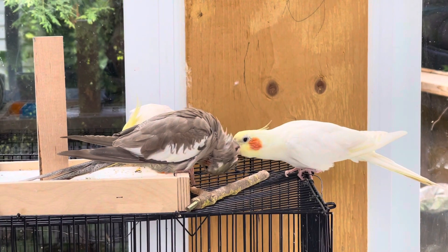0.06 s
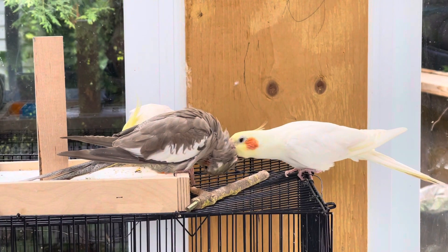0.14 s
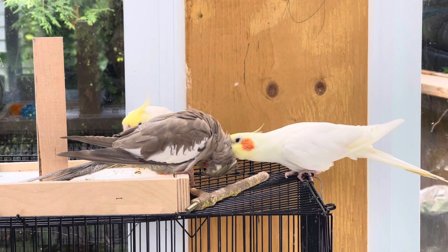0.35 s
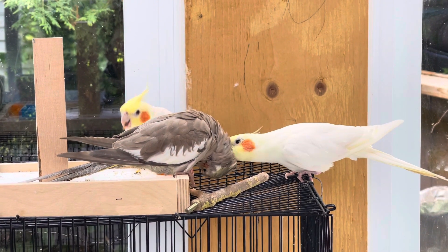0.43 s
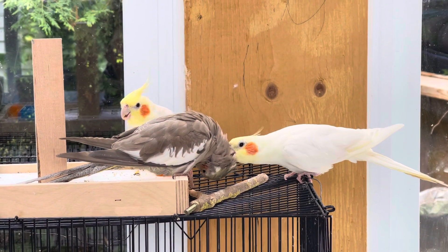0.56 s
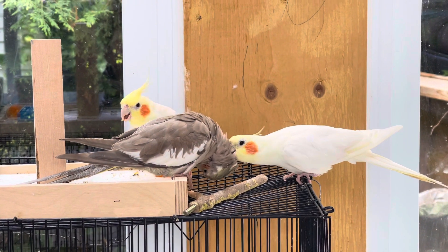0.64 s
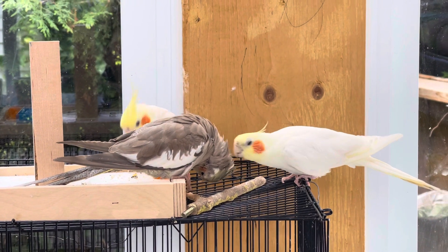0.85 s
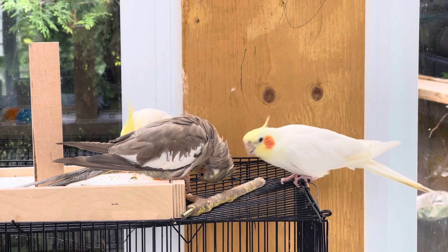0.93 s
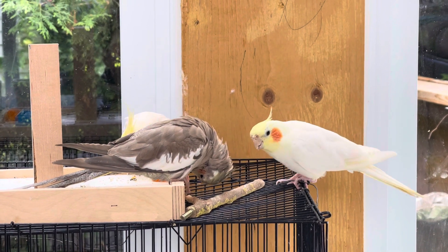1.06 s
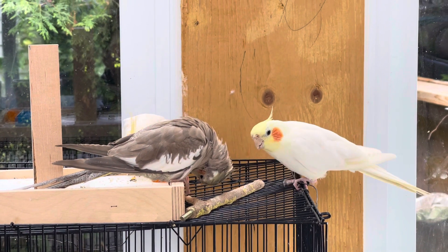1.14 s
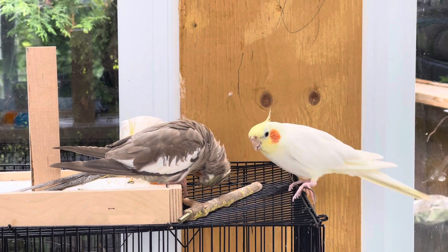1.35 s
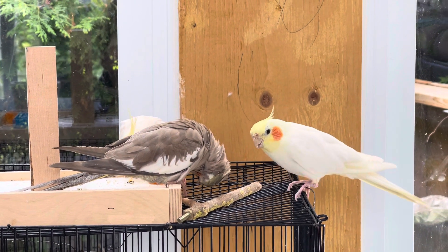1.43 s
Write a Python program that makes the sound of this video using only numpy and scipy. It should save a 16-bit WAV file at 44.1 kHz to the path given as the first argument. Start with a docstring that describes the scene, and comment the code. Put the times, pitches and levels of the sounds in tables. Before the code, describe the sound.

A cockatiel hisses three times, with light claw taps and rustling feathers.

```python
"""A small live room, on top of a cage: a cockatiel hisses three times at another, forcing air through
throat and open beak; the second hiss breaks into a short rising squeak. Claws tap on wood and wire,
feet scuff and feathers rustle as it draws back. The room answers, over a low rumble and a machine's hum.
The recorder's stereo processing shifts left against right in phase, by frequency."""
import sys
import numpy as np
from scipy import signal
from scipy.fft import rfft, irfft, next_fast_len
from scipy.io import wavfile
from scipy.ndimage import map_coordinates

SR = 44100
rng = np.random.default_rng(int(sys.argv[2]) if len(sys.argv) > 2 else 0)


def digitize_waveform(pressure):
    """Quantize a signal to 16-bit integers and store it at the path in sys.argv[1].

    Rows of a 2-D input are taken as channels; values are limited to [-1, 1].
    """
    field = np.atleast_2d(pressure).T
    bounded = np.clip(field, -1, 1)
    quanta = np.round(bounded * 32767).astype(np.int16)
    wavfile.write(sys.argv[1], SR, quanta)


N = 66150


def amp(db):
    return 10 ** (np.asarray(db) / 20)


def unit(x):
    return x / np.sqrt(np.mean(x ** 2) + 1e-20)


def times():
    return np.arange(N) / SR


def decay(age_s, t60_s):
    return np.exp(-np.log(1000) * age_s / t60_s)


def along(points, hz):
    """Interpolate (f/Hz, value) points on a log axis."""
    f, value = np.transpose(points)
    return np.interp(np.log(hz + 1), np.log(f + 1), value)


def curves(rows):
    """One value per sample for each column after the time."""
    t, *columns = np.transpose(rows)
    return [np.interp(times(), t, column) for column in columns]


def during(rows, fade_s=0.012):
    """Soft gate from a table's first time to its last."""
    return np.clip(np.minimum(times() - rows[0][0], rows[-1][0] - times()) / fade_s, 0, 1)


def wobble(rate_hz):
    """Smooth random curve, rate_hz knots a second."""
    return map_coordinates(rng.standard_normal(N // 8), [times() * rate_hz], mode="mirror")


def filtered(x, response):
    """Apply a frequency response to x."""
    size = next_fast_len(N + SR // 2)
    return irfft(rfft(x, size) * response(np.fft.rfftfreq(size, 1 / SR)), size)[..., :N]


def noise(colour):
    """Coloured noise of rms 1."""
    return unit(filtered(rng.standard_normal(N), lambda hz: amp(along(colour, hz))))


def spread(mid, side):
    """Two unrelated signals as a diffuse left and right."""
    # Side over mid: f/Hz, ratio/dB
    width = [(60, -23.5), (200, -14.5), (450, -5.5), (800, -2), (1400, -8), (2000, -15), (7000, -12.5),
             (11000, -70)]
    angle = lambda hz: np.arctan(amp(along(width, hz)))
    gains = lambda hz: np.array([np.cos(angle(hz)), np.sin(angle(hz))])
    mid, side = filtered(np.array([mid, side]), gains)
    return np.array([mid + side, mid - side])


def hisses(flutter_hz=262.5, flutter_db=1.5):
    """An uneven air stream forced through the throat and open beak."""
    # Air pressure of each hiss: t/s, relative level/dB
    pressures = [[(.135, -95), (.17, -58.5), (.215, -51), (.25, -42.5), (.3, -35), (.33, -37.5), (.38, -51),
                  (.425, -59), (.445, -72)], [(.42, -54), (.435, -50), (.48, -48.5), (.51, -48.5), (.535, -45.5),
                                      (.575, -55), (.62, -57)], [(.835, -69), (.855, -46), (.89, -45.5),
                                                           (.915, -44.5), (.96, -46.5), (1.0, -57),
                                                           (1.05, -71), (1.09, -85)]]
    # Throat and beak spectrum of each hiss: f/Hz, relative density/dB
    colours = [[(300, -45), (750, -24.5), (1100, -0.5), (1700, -4), (2200, -5.5), (3100, -3), (4300, -1),
                (5400, 4), (6600, -2.5), (8000, 5), (9000, -11), (9800, 5.5), (11300, -9), (13300, -23.5)], [(300, -42), (700, -12.5), (1050, 2.5), (1800, 0), (2600, 2),
                                      (3500, 1.5), (4000, -4), (6000, -15.5), (7100, -10), (8000, -14.5),
                                      (8800, -7), (11000, -5), (13000, -50)], [(300, -7), (750, -17), (1100, 2), (1750, 0),
                                                             (2100, -4), (2800, -8.5), (3200, 1), (3700, 0),
                                                             (4500, -7.5), (6200, -2), (7000, -5.5),
                                                             (9000, -8), (10800, -3.5), (13000, -51)]]
    out = np.zeros(N)
    for pressure, colour in zip(pressures, colours):
        level_db, = curves(pressure)
        stream = unit(noise(colour) * amp(flutter_db * wobble(flutter_hz)))
        out += during(pressure) * amp(level_db) * stream
    return out


def resonances():
    """Half-whistled bands of the hiss swell and glide as the throat moves."""
    # Air-driven resonances: start/s, length/s, from/Hz, to/Hz, width/Hz, relative level/dB
    bands = [(0.145, 0.1115, 1110, 1330, 240, -53), (0.207, 0.111, 1500, 1390, 360, -43.5),
             (0.215, 0.0895, 1720, 1900, 450, -49), (0.19, .085, 2750, 4000, 600, -52.5),
             (.245, .036, 3334, 2600, 500, -48.5), (.243, 0.029, 7400, 5300, 1100, -47.5),
             (.455, 0.0568, 2340, 2060, 330, -47), (.485, .1, 2200, 2220, 340, -50),
             (.464, 0.0297, 7250, 6900, 450, -51), (0.509, 0.086, 1205, 1122, 310, -52.5),
             (0.517, 0.075, 1497, 1400, 260, -52), (0.848, 0.129, 1100, 1200, 280, -50.5),
             (.895, .095, 1650, 1780, 440, -52.5), (0.894, .045, 2600, 3400, 450, -51.5),
             (.94, 0.027, 3500, 3800, 650, -53), (1.025, 0.056, 1450, 1600, 400, -61.5)]
    out = np.zeros(N)
    for start_s, length_s, from_hz, to_hz, width_hz, db in bands:
        progress = np.clip((times() - start_s) / length_s, 0, 1)
        phase = 2 * np.pi * np.cumsum(from_hz + (to_hz - from_hz) * progress) / SR
        band = unit(wobble(width_hz) * np.cos(phase) + wobble(width_hz) * np.sin(phase))
        out += amp(db) * band * np.sin(np.pi * progress)
    return out


def squeak(jitter=0.0347, overtone_db=-13):
    """The syrinx catches for a moment in a rising tone."""
    # Syrinx tone: t/s, f/Hz, relative level/dB
    contour = [(.441, 2440, -84), (.447, 2760, -44.5), (.456, 3650, -36.5), (.461, 3497, -40.5),
               (.472, 3350, -52)]
    hz, level_db = curves(contour)
    phase = 2 * np.pi * np.cumsum(hz * (1 + jitter * wobble(rate_hz=600))) / SR
    tone = unit(np.sin(phase) + amp(overtone_db) * np.sin(2 * phase))
    return (during(contour) > 0) * amp(level_db) * tone


def taps():
    """Claw and beak contacts: sharp on wire, dull on wood."""
    # Contacts: t/s, level/dB, centre/Hz, width/octaves, t60/s
    contacts = [(.429, -46, 900, 0.2, 0.065), (.427, -46, 2900, 0.66, .02), (0.834, -51, 3700, 1, 0.0106),
                (1.098, -52, 9800, 0.21, 0.0071)]
    out = np.zeros(N)
    for start_s, db, centre_hz, octaves, t60_s in contacts:
        age_s = times() - start_s
        band = lambda hz: np.exp(-.5 * (np.log2((hz + 1) / centre_hz) / octaves) ** 2)
        crack = unit(filtered(rng.standard_normal(N), band))
        out += (age_s >= 0) * amp(db) * decay(np.abs(age_s), t60_s) * crack
    return out


def rustles():
    """Feathers brush as the birds shift."""
    # Brushes: t/s, relative level/dB, rise/s, t60/s
    brushes = [(.70, -57, 0.13, 1), (1.168, -62.5, 0.005, 0.22), (1.249, -56, 0.0012, 0.22),
               (1.473, -68, 0.0031, 0.15)]
    # Feather spectrum: f/Hz, relative density/dB
    feathers = [(500, -11), (1600, -7), (2500, -8), (3500, 3.5), (4800, -6), (6500, -3), (8400, 9),
                (9600, 5.5), (10700, 11), (11600, -6), (12600, -31)]
    out = np.zeros(N)
    for start_s, db, rise_s, t60_s in brushes:
        age_s = np.maximum(times() - start_s, 0)
        envelope = (1 - np.exp(-age_s / rise_s)) * decay(age_s, t60_s)
        out += amp(db) * envelope * noise(feathers)
    return out


def shuffle():
    """Feet scuff dully on the wooden tray and the cage top."""
    # Scuffing: t/s, level/dB
    scuffs = [(.62, -76), (.72, -57.5), (.8, -57.5), (.9, -56), (1.0, -60), (1.12, -83), (1.18, -66),
              (1.3, -69.5), (1.5, -70)]
    # Scuff spectrum: f/Hz, relative density/dB
    colour = [(120, -22), (240, -5), (410, 1), (520, -4.5), (650, -5), (1200, -4), (2200, -15),
              (5000, -23.5), (12000, -43.5)]
    level_db, = curves(scuffs)
    return during(scuffs) * amp(level_db) * spread(noise(colour), noise(colour))


def near_boards(x, count=6, echo_db=-10.5, first_s=0.001009, span_s=0.009):
    """Quick echoes off the tray and the board behind comb the sound."""
    delays_s = first_s + span_s * rng.random(count)
    echoes = sum(np.pad(x, (round(s * SR), 0))[:N] for s in delays_s)
    return x + amp(echo_db) / np.sqrt(count) * echoes


def room(x, delay_s=0.005):
    """The room's diffuse answer, lasting longest in the midrange."""
    # Room decay: f/Hz, t60/s
    t60 = [(300, 0.24), (1500, 0.53), (2300, 0.5), (3500, 0.47), (6500, 0.48), (12000, 0.31)]
    hz, t, spectra = signal.stft(rng.standard_normal((2, SR * 3 // 4)), SR, nperseg=256)
    tail = signal.istft(spectra * decay(t, along(t60, hz)[:, None]), SR, nperseg=256)[1]
    tail *= np.clip(np.arange(tail.shape[1]) / SR / delay_s - 1, 0, 1)  # gap, then an equal fade-in
    tail /= np.linalg.norm(tail[0])
    return spread(*signal.fftconvolve(x[None], tail, axes=1)[:, :N])


def hum(waver_rad=0.14, waver_hz=8.6):
    """A distant machine's tones, wavering in phase."""
    # Machine tones: f/Hz, relative level/dB
    tones = [(60, -76), (98, -60), (120, -68), (196, -71), (296, -71), (401, -76.5)]
    # Swell of all tones: t/s, gain/dB
    swell = [(0, -6), (.4, -8.5), (.68, -3), (.76, 1.5), (1.0, 2), (1.17, -2), (1.33, 0), (1.5, 2.5)]
    gain_db, = curves(swell)
    out = np.zeros(N)
    for hz, db in tones:
        phase = 2 * np.pi * (hz * times() + rng.random())
        out += amp(db) * unit(np.sin(phase + waver_rad * wobble(waver_hz)))
    return amp(gain_db) * out


def rumble():
    """Low, diffuse room noise, drifting in level."""
    # Rumble spectrum: f/Hz, relative density/dB
    colour = [(20, -18), (35, -9), (60, 0.5), (100, -1), (160, -8), (300, -9.5), (450, -15.5), (700, -19),
              (1200, -32), (2200, -45), (5000, -55)]
    # Drift: t/s, level/dB
    drift = [(0, -58), (.15, -61.5), (.45, -59.5), (.7, -60), (.8, -60.5), (1.05, -58.5), (1.2, -57.5),
             (1.5, -57)]
    level_db, = curves(drift)
    return amp(level_db) * spread(noise(colour), noise(colour))


def air(level_db=-81):
    """Faint, steady room air."""
    # Air spectrum: f/Hz, relative density/dB
    colour = [(500, 20.5), (2000, 5), (6000, 3.5), (8500, 11.5), (11000, 10.5), (13000, -20)]
    return amp(level_db) * spread(noise(colour), noise(colour))


def scene(bird_db=-1, bird_room_db=-2.5, tap_room_db=-13):
    """The birds in their room."""
    bird = near_boards(hisses() + rustles()) + resonances() + squeak()
    claws = taps()
    bird = bird + amp(bird_room_db) * room(bird)
    claws = claws + amp(tap_room_db) * room(claws)
    return amp(bird_db) * bird + claws + shuffle() + hum() + rumble() + air()


def record(dry):
    """Stereo processing shifts left against right in phase; the top end rolls off to the band limit."""
    # Left channel's lead over the right: f/Hz, phase/rad
    channel_phase = [(0, 0), (500, -.3), (1050, -1.2), (1850, 0), (2800, .7), (4100, .75), (4600, 1.6),
                     (5000, 3.9), (5500, 6.1), (6200, 6.3), (8600, 9.2), (9500, 9.6), (12000, 12.56)]
    # Microphone response: f/Hz, gain/dB
    roll_off = [(11000, -0.5), (11800, 3), (13300, -13)]
    top_hz = 13300

    def response(hz):
        lead_rad = np.interp(hz, *np.transpose(channel_phase))
        channels = np.exp(.5j * lead_rad * np.array([[1], [-1]]))
        return channels * amp(along(roll_off, hz)) * (hz < top_hz)

    return filtered(dry, response)


dry = scene()
out = record(dry)
digitize_waveform(out)
```